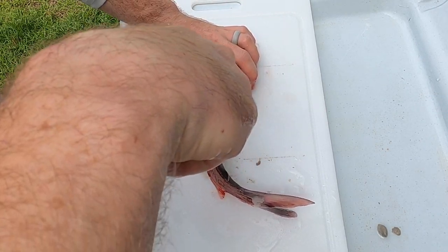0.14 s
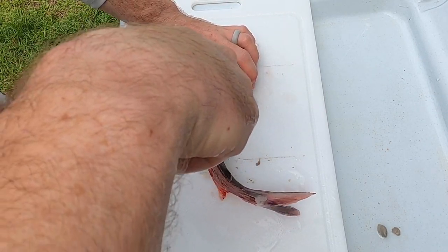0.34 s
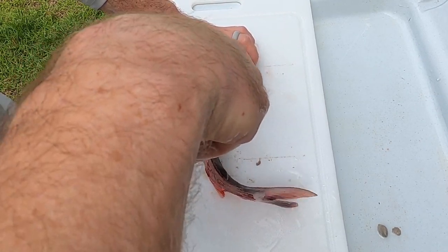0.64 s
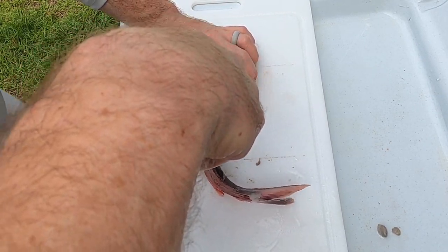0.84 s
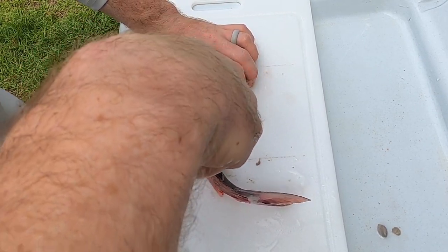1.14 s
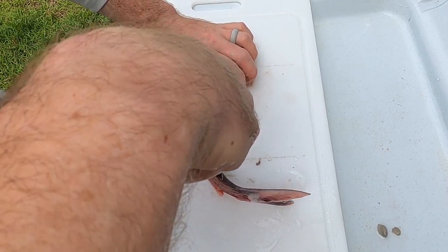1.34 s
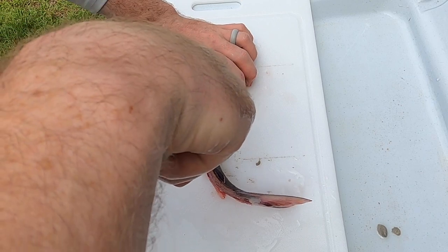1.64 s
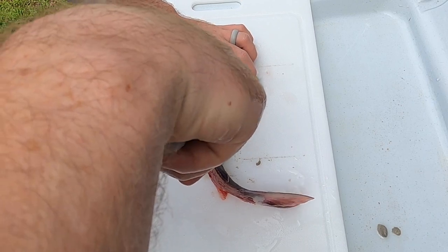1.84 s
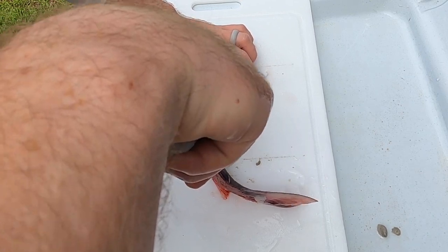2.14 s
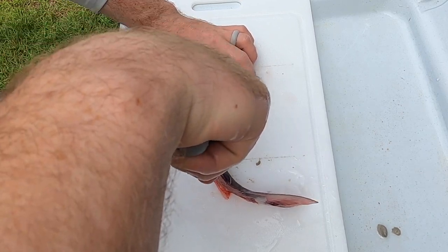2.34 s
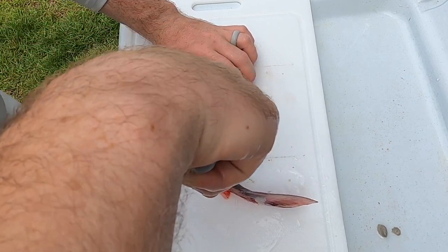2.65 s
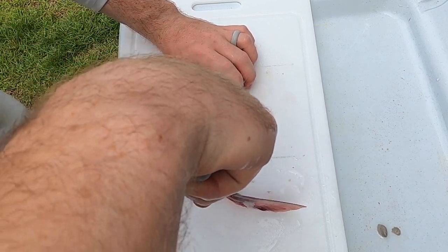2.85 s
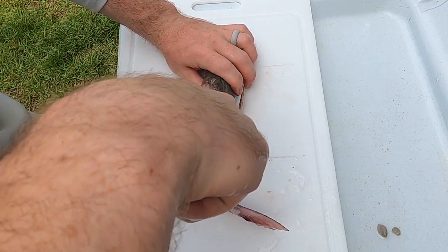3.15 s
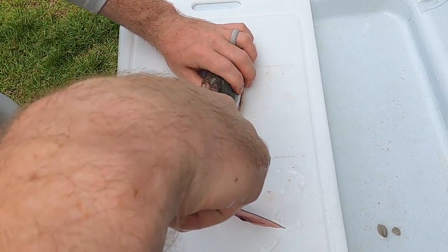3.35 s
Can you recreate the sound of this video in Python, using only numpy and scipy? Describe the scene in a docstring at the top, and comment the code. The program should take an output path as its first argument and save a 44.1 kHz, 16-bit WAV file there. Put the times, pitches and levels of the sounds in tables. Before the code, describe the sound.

Close outdoor sound of fish being cut: one early hollow thump, light crackly strokes, then harder rasps and snaps, with a low motor hum, soft air and a faint insect trill at first.

```python
"""Outdoors, a motor drones throughout, beating slowly against a second low tone, over air wash and light wind.
An insect trills at first as noise through narrow resonances, and a faint narrow tone sounds briefly.
A knife saws in short strokes along a fish on a hollow plastic lid: stick-slip noise and snapping bones
drive the modes of the blade and lid. Early on the blade knocks the lid, which cracks, booms and rattles.
Late come a thin band of hiss and a creak of the lid under the hardest push."""
import sys
import numpy as np
from scipy import signal
from scipy.io import wavfile
from scipy.ndimage import uniform_filter1d

SR = 44100
rng = np.random.default_rng(int(sys.argv[2]) if len(sys.argv) > 2 else 0)


def store_wav(level_fs):
    """Save 16-bit WAV to argv[1]."""
    pcm = np.round(np.clip(np.atleast_2d(level_fs), -1, 1) * 32767)
    wavfile.write(sys.argv[1], SR, pcm.T.astype(np.int16))


N = 154350
T = np.arange(N) / SR  # seconds

# The saw strokes, one list per stroke. Each row: time in seconds, relative level in dB,
# main ring of the blade in Hz, treble share in dB.
STROKES = [
    [(0.246, -62, 3250, -2), (0.257, -43.5, 3250, -2), (0.264, -40.5, 3220, 0), (0.275, -64, 3200, -2)],
    [(0.638, -27, 3270, 1), (0.644, -37, 3300, -1.0), (0.666, -34.5, 3360, 5.5), (0.7, -62, 3430, 4),
     (0.71, -65, 3440, -1.0)],
    [(0.72, -70, 3320, -3), (0.752, -56, 3330, -3), (0.758, -47, 3320, -1.0), (0.784, -78, 3420, -1.0),
     (0.79, -71, 3420, -4)],
    [(0.93, -66, 3130, -1.0), (0.942, -55, 3140, 1), (0.948, -68, 3160, -1.0), (0.97, -56, 3230, 9),
     (0.982, -73, 3200, 2), (0.996, -63, 3190, -3), (1.0, -71, 3190, -1.0)],
    [(1.06, -71, 3230, -1.0), (1.072, -57, 3190, -1.0), (1.124, -47.5, 3180, -2), (1.156, -65, 3160, -1.0),
     (1.162, -55, 3110, -1.0), (1.17, -59, 3100, -1.0)],
    [(1.19, -55, 3280, -1.0), (1.214, -35.5, 3220, 3.5), (1.24, -39, 3140, 0), (1.268, -40.5, 3400, 1),
     (1.29, -72, 3400, -3)],
    [(1.44, -58, 3280, -1.0), (1.446, -54, 3280, -1.0), (1.456, -44, 3300, 4), (1.468, -46, 3300, -1.0),
     (1.476, -39, 3340, 7), (1.54, -60, 3290, 1)],
    [(1.56, -64, 3230, -3), (1.562, -65, 3220, -1.0), (1.596, -46.5, 3260, 1), (1.65, -46.5, 3250, -1.5),
     (1.676, -57, 3150, -1.0), (1.682, -73, 3150, -1.0), (1.69, -59, 3140, -4)],
    [(1.7, -58, 3290, -3), (1.706, -61, 3300, -1.0), (1.716, -43, 3340, -4), (1.728, -53, 3350, -1.0),
     (1.742, -40.5, 3380, 2), (1.75, -49.5, 3400, 4), (1.81, -60, 3350, 0)],
    [(1.85, -62, 3270, -3), (1.864, -74, 3270, -1.0), (1.878, -49.5, 3250, 3.5), (1.926, -60, 3210, 1),
     (1.932, -71, 3220, -1.0), (1.94, -68, 3210, -1.0)],
    [(2.018, -37, 3340, -5), (2.028, -52, 3280, -8), (2.074, -43, 3230, 4), (2.086, -46, 3220, 0),
     (2.108, -68, 3220, 1), (2.12, -63, 3220, -1.0)],
    [(2.146, -36, 3320, -6), (2.154, -40.5, 3200, -4), (2.218, -44, 3160, -9), (2.27, -77, 3110, -1.0)],
    [(2.308, -32.5, 3210, 4.5), (2.318, -44, 3210, 2), (2.4, -39, 3240, -2), (2.43, -61, 3210, -3)],
    [(2.435, -60, 3050, -1.0), (2.463, -47, 3040, 0.5), (2.523, -43, 3200, -5), (2.547, -52, 3100, 3),
     (2.595, -49, 3100, 6), (2.6, -36, 3060, 3)],
    [(2.606, -38.5, 3150, 2.5), (2.666, -40.5, 3060, 3), (2.672, -37.5, 3030, 2), (2.704, -46.5, 3000, 0),
     (2.73, -67, 3010, -1.0)],
    [(2.74, -52.5, 3150, 3), (2.778, -38.5, 3130, -4), (2.824, -45.5, 3170, -5), (2.846, -40.5, 3080, -10),
     (2.866, -51, 3100, -4), (2.89, -55, 3120, -1.0)],
    [(2.897, -43, 3060, -1.0), (2.908, -36, 3060, -2), (2.949, -42.5, 3110, 0), (2.958, -35, 3170, -4),
     (3.017, -61, 3220, 1), (3.02, -59, 3200, 3)],
    [(3.05, -48, 3250, -4), (3.074, -65, 3190, -3), (3.082, -44, 3160, -8), (3.104, -56, 3140, -2),
     (3.114, -50.5, 3210, -8), (3.156, -74, 3160, 2), (3.16, -61, 3130, -1.0)],
    [(3.19, -72, 3150, -5), (3.212, -40.5, 3090, 0), (3.244, -46, 3020, -1), (3.252, -39.5, 3050, 11),
     (3.264, -52, 3000, 3), (3.27, -42, 3070, 0), (3.33, -61, 3170, -1.0)],
]


def amp(db):
    """Decibels to amplitude ratio: 20 dB is a factor of ten."""
    return 10 ** (np.asarray(db) / 20)


def even(x):
    """Normalization to unit rms, the root of the mean power."""
    return x / np.sqrt(np.mean(x ** 2) + 1e-20)


def read(points, hz):
    """A spectrum interpolated along logarithmic frequency."""
    f, value = np.transpose(points)
    return np.interp(np.log(hz + 1), np.log(f + 1), value)


def curve(rows, column=1):
    """An amplitude envelope linear in dB, silent outside its span, with soft ends."""
    rows = np.array(rows)
    inside = 1. * ((T > rows[0, 0]) & (T < rows[-1, 0]))
    return uniform_filter1d(inside, size=150) * amp(np.interp(T, rows[:, 0], rows[:, column]))


def resonate(x, hz, width):
    """A damped resonator of gain near 1: the pole radius sets the bandwidth."""
    r = np.exp(-np.pi * width / SR)
    zeros = [(1 - r * r) / 2, 0, -(1 - r * r) / 2]
    poles = [1, -2 * r * np.cos(2 * np.pi * hz / SR), r * r]
    return signal.lfilter(zeros, poles, x)


def ring(modes):
    """Modal impulse response: exponentially decaying tones, neighbours in opposite phase."""
    t = T[:8192]
    out = 0
    for k, (hz, db, t60) in enumerate(modes):
        decay = amp(db - 60 * t / t60)
        out = out + (-1) ** k * decay * np.sin(2 * np.pi * hz * t)
    return out


def strike(x, hz, db, t60):
    """Heterodyned mode of moving pitch: shift down to zero, let it die away, shift back."""
    turn = np.exp(2j * np.pi * np.cumsum(hz * np.ones(N)) / SR)
    decaying = signal.lfilter([1], [1, -amp(-60 / (t60 * SR))], x / turn)
    return amp(db) * (turn * decaying).imag


def slow(hz):
    """Slow random modulation of rms 1: sines of random phase from 0.2 Hz up to hz."""
    rates = np.geomspace(.2, hz, num=16)
    return even(sum(np.sin(2 * np.pi * (f * T + rng.random())) / np.sqrt(f) for f in rates))


def pan(x, db):
    """Stereo level difference: left minus right in dB."""
    return x * amp([[db / 2], [-db / 2]])


def drone():
    """Harmonics of a rotating motor; a tone just under the second order interferes with it and beats."""
    motor_hz, second_hz, third_hz = 37.35, 71.5, 259.3
    beat_top_s = .02  # second order and second tone in phase here
    waver_db, high_waver_db = .4, 2.5
    # Motor orders. Each row: multiple of the motor rate, level in dB.
    orders = [(1, -28), (2, -33.5), (4, -40), (5, -44.5), (6, -45), (8, -54), (10, -53), (11, -58.5)]
    t = T - beat_top_s
    out = amp(-24 + waver_db * slow(2.4)) * np.cos(2 * np.pi * second_hz * t)
    out = out + amp(-48 + high_waver_db * slow(17.0)) * np.cos(2 * np.pi * third_hz * t)
    for k, db in orders:
        order_waver_db = (waver_db if k < 3 else high_waver_db) * slow(6.)
        phase = (k != 2) * rng.random()
        out = out + amp(db + order_waver_db) * np.cos(2 * np.pi * k * motor_hz * t + phase)
    return pan(np.sqrt(2) * out, 0.48)


def air():
    """Diffuse field: partly coherent noise shaped in short-time spectra as distant rumble and outdoor wash."""
    level_db, patch_db, rumble_top_hz = -27.5, 2.23, 450
    # Power spectrum of the air. Each row: frequency in Hz, relative density in dB per Hz.
    density = [(15, -25.5), (25, -0.5), (45, -9.5), (58, -1), (75, -5.5), (90, -8), (110, -12.5),
               (135, -10), (180, -15), (240, -18), (320, -24.5), (420, -29), (520, -31.5), (750, -36.5),
               (1200, -35), (1660, -43), (2980, -46), (5500, -51.5), (8200, -62.5), (10000, -62),
               (11000, -91), (12500, -106), (16000, -125)]
    # Coherence of the ports. Each row: frequency in Hz, left-right likeness from 0 to 1.
    likeness = [(30, 0.58), (70, 0.98), (180, 1), (550, 0.84), (1650, 0.6), (5000, .35), (12000, .05)]
    # Stereo balance. Each row: frequency in Hz, left minus right in dB.
    balance = [(60, 1.5), (180, 1.5), (550, 1.5), (1650, 5), (4970, 1), (15000, 6)]
    # Slow swells. Each row: time in seconds, swell of the rumble in dB, swell of the wash in dB.
    swells = [(0, 0, -0.5), (.3, 0.5, -1), (.6, 1.5, 0.), (.9, -0.5, -2.5), (1.2, 0., 0), (1.5, 2, .5),
              (1.8, 1, 0), (2.1, -2.5, -1.5), (2.4, -1.5, 0), (2.7, -1, 0.5), (3.0, 3, .5),
              (3.25, 0.5, -0.5), (3.5, 1, 1)]
    frames, hz = N // 512 + 6, np.fft.rfftfreq(2048, 1 / SR)
    a, b, c, d, patches = rng.standard_normal((frames, 1025, 5)).T
    patches = uniform_filter1d(patches, size=16, axis=0)
    patches = even(uniform_filter1d(patches, size=6, axis=1))
    same = np.clip(read(likeness, hz), -1, 1)[:, None]
    left = a + 1j * b
    right = same * left + np.sqrt(1 - same ** 2) * (c + 1j * d)
    z = np.array([left, right]) * amp(read(density, hz)[:, None] + patch_db * patches)
    s, low_db, high_db = np.transpose(swells)
    at = (np.arange(frames) * 512 - 512) / SR
    low = 1 / (1 + (hz[:, None] / rumble_top_hz) ** 3)
    z = z * amp(low * np.interp(at, s, low_db) + (1 - low) * np.interp(at, s, high_db))
    z = z * amp(np.outer([.5, -.5], read(balance, hz)))[:, :, None]
    sound = signal.istft(z, nperseg=2048, noverlap=1536)[1][:, 512:N + 512]
    return amp(level_db) * even(sound)


def wind():
    """Turbulent pressure at the microphone: low resonant noise, only partly coherent between the ports."""
    hz, width_hz = 46.4, 44
    # Gusts. Each row: time in seconds, level in dB.
    gusts = [(0.0, -39), (0.17, -60), (0.39, -23), (0.43, -39), (0.54, -43), (1.61, -52), (1.71, -16.5),
             (1.94, -59), (2.08, -40), (2.3, -44), (2.41, -37), (3.08, -43), (3.44, -41), (3.5, -45)]
    n = rng.standard_normal((3, N))
    n = n[:2] + 0.34 * n[2]  # the third noise is common to both ports
    lumps = resonate(resonate(n, hz, width_hz), hz, width_hz)
    return curve(gusts) * even(lumps)


def thin_hiss():
    """Band-limited noise: a steep bandpass leaves only a thin high hiss."""
    # Each row: time in seconds, relative level in dB.
    levels = [(2.42, -75), (2.476, -64.5), (2.544, -66), (2.826, -68.5), (2.966, -65), (3.03, -85)]
    band = signal.butter(6, [8200, 12900], "band", fs=SR, output="sos")  # Hz
    noise = even(signal.sosfilt(band, rng.standard_normal((2, N))))
    return curve(levels) * noise * amp(7.5)


def narrow_tone():
    """Frequency modulation: a faint sine whose pitch sags steadily and wavers at random."""
    start_hz, sag_hz_per_s, waver_hz = 1850, 70, 10
    # Each row: time in seconds, level in dB.
    levels = [(0.29, -68), (0.33, -59), (0.4, -62), (0.46, -54.5), (0.52, -63), (0.56, -59), (0.62, -63)]
    waver = even(uniform_filter1d(rng.standard_normal(N), size=600))
    hz = start_hz - sag_hz_per_s * T + waver_hz * waver
    tone = np.sqrt(2) * np.sin(2 * np.pi * np.cumsum(hz) / SR)
    return pan(curve(levels) * tone, 3.7)


def trill():
    """Amplitude-modulated source and filter: double scrapes of noise excite narrow wing resonances."""
    end_s, scrapes_per_s = 1.12, 72.3
    scrape_depth, double_depth = .6, .55
    # Wing resonances: centre frequencies in Hz.
    centres = [8750, 9000, 9300, 9480, 9670, 9810, 9920, 14200]
    # The same resonances in order. Each row: width in Hz, relative level in dB.
    wings = [(150, -81), (100, -77), (60, -67), (100, -68), (80, -66.5), (58, -66.5), (100, -65),
             (120, -76)]
    turn = 2 * np.pi * scrapes_per_s * T
    scrape = np.exp(scrape_depth * np.cos(turn) + double_depth * np.cos(2 * turn))
    n = scrape * rng.standard_normal((2, N))
    n = n + 0.6 * n[::-1]  # each side shares some of the other
    sound = 0
    for hz, (width, db) in zip(centres, wings):
        sound = sound + amp(db) * even(resonate(resonate(n, hz, width), hz, 0.79 * width))
    return pan(1, 5.6) * sound * uniform_filter1d(1. * (T < end_s), size=600)


def rub():
    """Friction-driven resonance: noise through two broad modes of the lid makes it creak."""
    # The creak under the hardest push. Each row: time in seconds, relative level in dB.
    creak = [(2.52, -50), (2.614, -38), (2.712, -60), (2.718, -70), (2.74, -53)]
    # Lid resonances. Each row: frequency in Hz, width in Hz, relative level in dB.
    lid = [(1010, 280, -6), (2010, 210, -10.5)]
    n = rng.standard_normal(N)
    sound = sum(amp(db) * even(resonate(resonate(n, hz, w), hz, w)) for hz, w, db in lid)
    return pan(curve(creak) * sound, 3.9)


def knock():
    """Impact excitation of modes: the blade drops onto the hollow lid, which cracks, booms and rattles."""
    knock_s, push_s = .6285, .0025
    rattle_s, rattle_db, rattle_fade_db = 0.081, -34.5, -3.5
    crack_db, crack_rise_s, crack_s = -17.5, .0006, 0.0034
    # Modes of the lid. Each row: frequency in Hz, relative level in dB, 60 dB decay time in seconds.
    lid = [(79.5, -8.5, 0.082), (111, -16, 0.081), (171, -23.5, 0.033), (238.5, -17.5, 0.065),
           (305, -25, 0.038), (390, -17, 0.044), (493, -17.5, 0.036), (630, -17.5, 0.019),
           (786, -21, 0.018), (1050, -19, 0.022), (1490, -22, 0.009), (1940, -14.5, 0.013),
           (2500, -23, 0.0058)]
    t = T - knock_s
    rattle = amp(rattle_db + rattle_fade_db * np.clip(t / rattle_s, 0, 1))
    rattle = rattle * rng.standard_normal(N) * (rng.random(N) < .3)  # sparse random contacts
    rattle = rattle * (t > 0) * np.clip((rattle_s - t) / 0.018, 0, 1)
    rattle = signal.sosfilt(signal.butter(2, 1300, fs=SR, output="sos"), rattle)
    contacts = 0.25 + rng.standard_normal(N) * (rng.random(N) < .1)
    push = (t > 0) * np.exp(-np.abs(t) / push_s) * contacts
    boom = signal.oaconvolve(rattle + amp(-17.0) * push, ring(lid))[:N]
    boom = signal.sosfilt(signal.butter(2, 60, "high", fs=SR, output="sos"), boom)
    band = signal.butter(3, [450, 5500], "band", fs=SR, output="sos")  # Hz
    crack = even(signal.sosfilt(band, rng.standard_normal(N)))
    crack = amp(crack_db) * crack * np.clip(t / crack_rise_s, 0, 1) * np.exp(-(t / crack_s) ** 2)
    return pan(crack + boom, .8)


def saw_slips(noise):
    """Stick-slip friction: uneven random slips in clumps, plus noise, drive the low, upper and treble modes."""
    slips_per_s, spread_db = 2500, 1.5
    sizes = amp(spread_db * np.minimum(rng.exponential(1, N), 3))
    slips = (rng.random(N) < slips_per_s / SR) * rng.standard_normal(N) * sizes
    clumps = amp(2.3 * even(uniform_filter1d(rng.standard_normal(N), size=120)))
    slips = even(even(slips * clumps) + 0.69 * noise) * amp(-3.5)
    body = sum(curve(s) for s in STROKES)
    bright = sum(curve(s) * curve(s, column=3) for s in STROKES)
    return np.array([slips * body, slips * bright, slips * bright])


def bone_snaps():
    """Brittle fracture: each snapping bone or scale is a first break and a crackle with a fading tail."""
    tail_s, tail_db = 0.015, -18
    # Each row: time in seconds, relative level in dB, crackle time constant in ms,
    # upper ring in dB, treble in dB, left minus right in dB.
    snaps = [(0.6292, -16, 4.3, 3, -15, 2.5), (0.6655, -33, 2.7, -6, -4, 3),
             (0.7567, -32, 3.6, -1, -15, -6), (0.9688, -38.5, 3, 2, -8, -4), (1.2035, -35, 1.5, 0, -4, 0),
             (1.2094, -31, 1.5, -1, -3, 0), (1.2150, -36, 1.6, -1, -4.0, 0.0), (1.2190, -30, 1.5, 1, -4, 2),
             (1.2538, -24.5, 2, -5, -4, 1), (1.2283, -24, 2.2, 5, -6, 3), (1.2478, -29, 2.5, -7, -2, -1),
             (1.265, -33.5, 1.9, 3, -9, 2), (1.4549, -31, 2.6, 5, -4.0, 1), (1.476, -28, 2.8, 7.5, -9, 0),
             (1.4946, -27, 3.5, 1.5, -10, 0.5), (1.7155, -29, 2.1, 2, -3, -0.5),
             (1.738, -32.5, 2.5, 1, -4.0, -5), (1.7669, -38.5, 2.8, 2, -7, -2),
             (1.79, -37.5, 2.5, -2, -6, 1.5), (2.0138, -8, 1.16, 0.5, -5, -3),
             (2.0172, -18.5, 2.4, 2, 1, 3), (2.0447, -32, 2.9, 13, -4.0, -1), (2.062, -32, 2.5, 2, -4.0, 1),
             (2.0790, -14, 1.1, -8, -9, 0), (2.0837, -24.5, 1.6, -3, -4.0, 4),
             (2.1409, -12.5, 1.2, -3.5, -5, 0), (2.1445, -21.5, 2.5, -2, -5, -2),
             (2.3044, -20, 2.6, 0, 1, 4), (2.31, -26.5, 2.2, 4.5, -4.0, -1),
             (2.3261, -26, 2.7, -9, -4.0, -3), (2.367, -30, 2.5, -5, -4.0, 0.0),
             (2.379, -27.5, 3.2, 5, -9, -2), (2.3976, -29, 2.7, 5, -4.0, -3),
             (2.6028, -21.5, 2.7, -4.5, 0, 1), (2.6125, -21.5, 3.5, -4, 1, 1),
             (2.6216, -25, 3.6, -6, -4.0, 1.5), (2.6308, -27, 2.5, -5, -4, 1), (2.642, -32, 3.5, -2, -1, 1),
             (2.653, -29, 4.5, -7, -2, 3), (2.6723, -23.5, 2.5, -6, 1, 3), (2.6790, -29, 4.3, -4, -4.0, -1),
             (2.7751, -30, 2.1, -5, -7, 0.5), (2.903, -25.5, 2.2, -5, -6, -5),
             (2.9060, -20.5, 3, -7, -10, 1), (2.952, -20, 2.2, -6, -6, 1.0), (2.9615, -29, 3, -9, -6, 1),
             (3.211, -36.5, 2.2, 4, 0, -3), (3.2512, -18.5, 2.5, -6.5, 1, 3),
             (3.272, -33, 2.5, -8, -4.0, 3)]
    drive = np.zeros((3, 2, N))
    t = T[:3000]
    crackles = np.sign(rng.standard_normal((len(snaps), 3, 3000)))
    crackles[:, 0, 0] = 3.  # the first break
    for (s, db, ms, upper_db, treble_db, pan_db), n in zip(snaps, crackles):
        shape = np.exp(-(1000 * t / ms) ** 2) + amp(tail_db) * np.exp(-t / tail_s)
        burst = pan(shape * (n[0] + .5 * n[1:]), pan_db) * amp(db - 10.5)
        i = round(s * SR)
        drive[:, :, i:i + 3000] += burst * amp([0, upper_db, treble_db])[:, None, None]
    return drive


def blade_bend(noise):
    """Bending shifts modal frequency: the pitch ratio follows the strokes while the blade shivers."""
    main_hz, shiver = 3220, .025
    rows = np.concatenate(STROKES)
    bend = uniform_filter1d(np.interp(T, rows[:, 0], rows[:, 2]), size=800) / main_hz
    return bend * (1 + shiver * even(uniform_filter1d(noise, size=250)))


def knife():
    """Forced modal vibration: slips and snaps drive one ring, whose lower modes move with the blade's bend."""
    upper_hz, treble_hz = 4000, 6300
    # Modes of blade and lid. Each row: frequency in Hz, relative level in dB, 60 dB decay time in seconds.
    modes = [(1200, -9.5, 0.014), (2080, -35, 0.0066), (2230, -21.5, 0.037), (2980, -4, 0.021),
             (3302, 6, 0.014), (3626, -1, 0.0088), (4140, -4.5, 0.0074), (4635, -7, 0.017),
             (4960, -1, 0.01), (5370, -5, 0.015), (6090, -14.5, 0.028), (6500, -9.5, 0.01),
             (6900, -26, 0.015), (9180, -35, .003), (10500, -40, 0.004)]
    noise = rng.standard_normal((2, N))
    drive = saw_slips(noise) + bone_snaps()
    bend = blade_bend(noise[0])
    out = 0
    for hz, db, t60 in modes:
        part = int(hz > upper_hz) + int(hz > treble_hz)  # low, upper or treble
        out = out + strike(drive[part], hz * (bend if hz < upper_hz else 1), db, t60)
    thin = signal.butter(2, 1720, "high", fs=SR, output="sos")
    return signal.sosfilt(thin, out) / np.linalg.norm(ring(modes))


def scene():
    """Superposition: the sound pressures of all sources add."""
    return drone() + air() + wind() + thin_hiss() + narrow_tone() + trill() + rub() + knock() + knife()


def record(dry):
    """Port delay and lowpass response: left hears a sample late, the microphone dulls the top, a band limit."""
    mic_hz, edge_hz = 8900, 15800
    faded = dry * np.minimum(T / .01, 1)  # quick fade in
    late = np.array([np.roll(faded[0], 1), faded[1]])
    dull = signal.sosfilt(signal.butter(2, mic_hz, fs=SR, output="sos"), late)
    band_limit = signal.firwin(511, edge_hz, window=("kaiser", 9), fs=SR)
    return signal.oaconvolve(dull, band_limit[None], "same")


dry = scene()
out = record(dry)
store_wav(out)
```